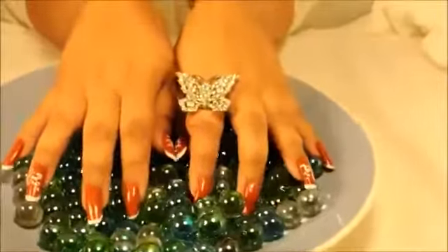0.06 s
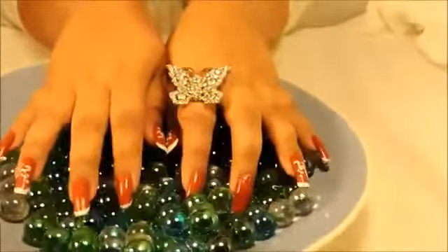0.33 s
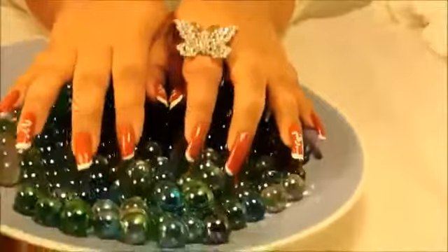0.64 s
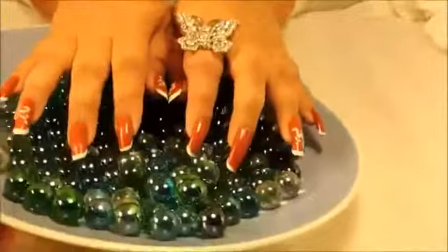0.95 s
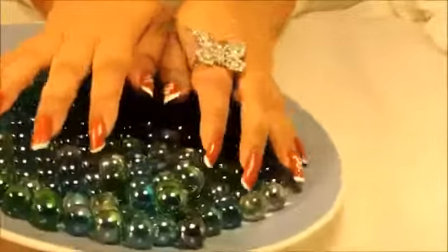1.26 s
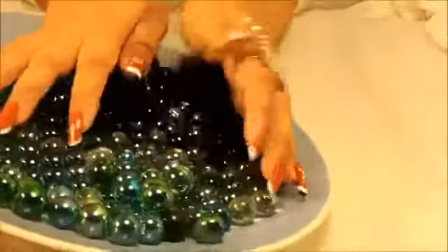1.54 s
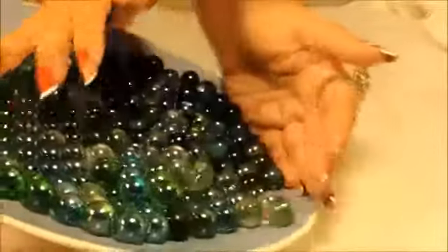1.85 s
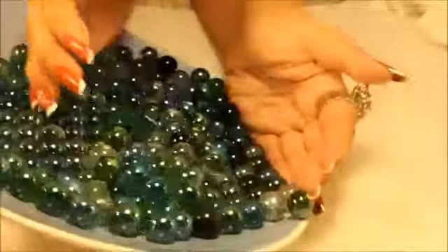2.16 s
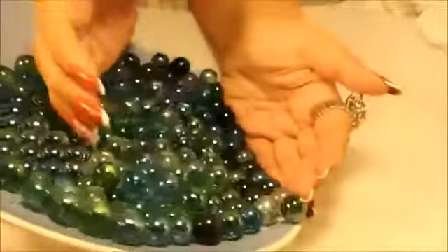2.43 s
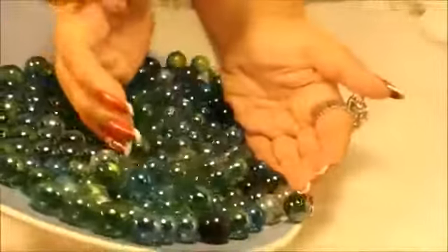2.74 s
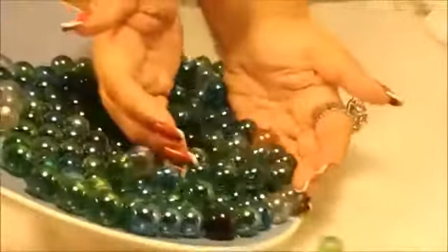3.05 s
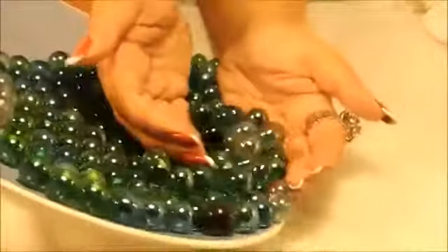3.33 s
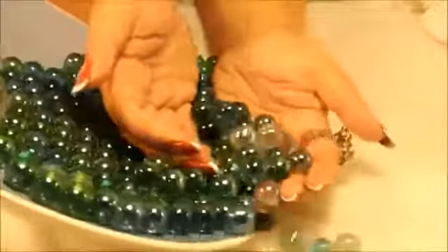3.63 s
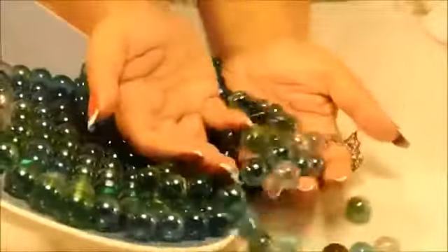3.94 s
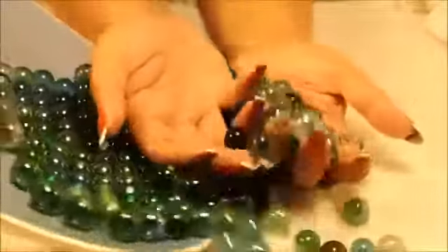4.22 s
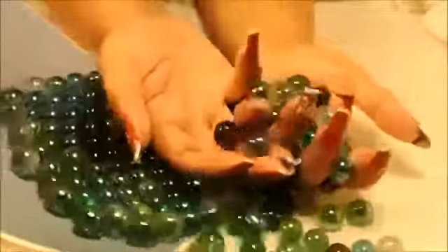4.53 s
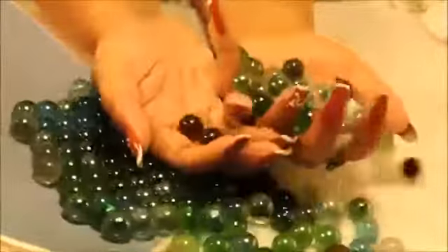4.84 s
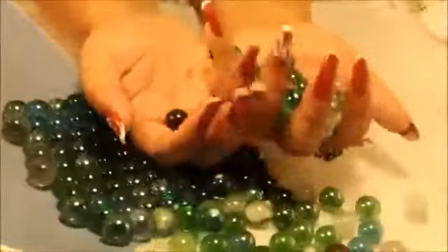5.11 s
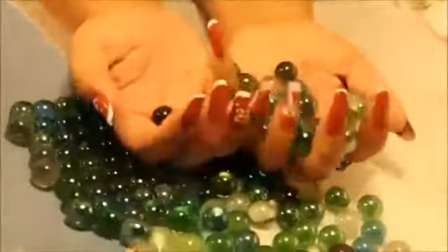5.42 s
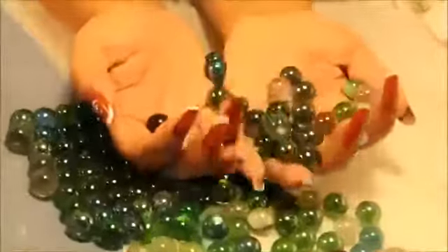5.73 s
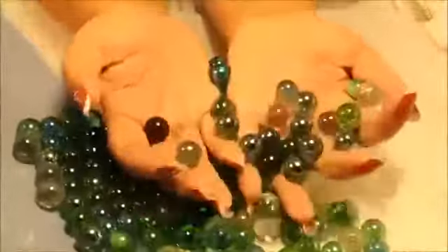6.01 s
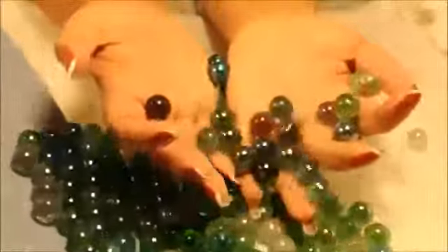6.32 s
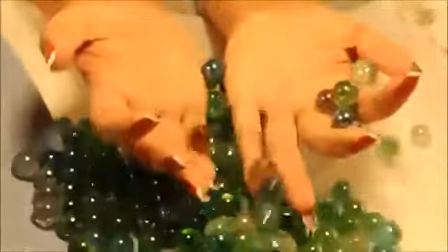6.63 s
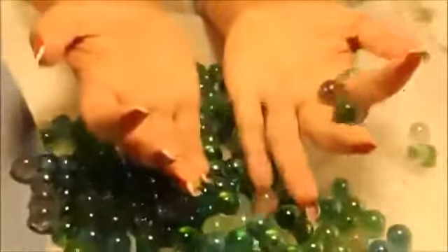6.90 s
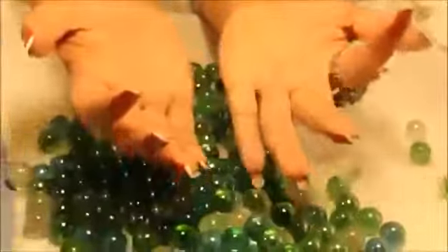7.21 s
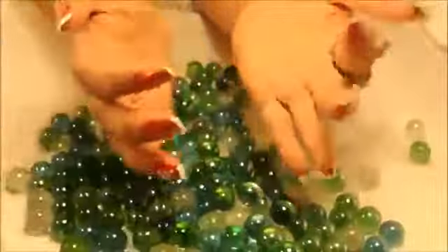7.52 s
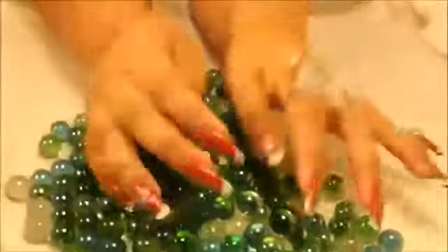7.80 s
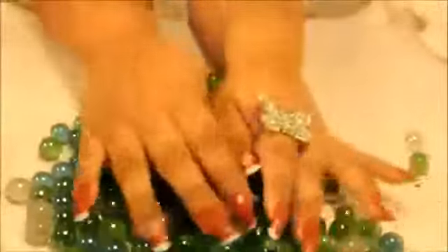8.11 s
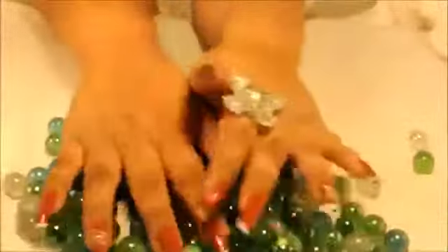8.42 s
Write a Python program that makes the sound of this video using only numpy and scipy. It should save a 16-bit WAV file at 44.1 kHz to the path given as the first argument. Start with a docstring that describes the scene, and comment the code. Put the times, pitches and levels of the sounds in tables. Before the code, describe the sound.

Glass marbles are handled on a plate, heard close and in stereo in a small bright room with a faint low rumble. From the start, fingers shove the heap in short bursts, giving sharp glassy clinks, strong around 0.7 seconds and busier from 1.3 to 2.6, with the plate ringing briefly underneath. From about 2.7 to 5.1 seconds two scooping strokes make a dense, continuous chatter and grind, while spilled marbles thud softly and bounce on a cloth-covered table; one knocks on the wood at 3.6. From 5.2 seconds the sound loosens into separate ticks and small slides as marbles trickle from the hands. Around 6.7 to 7 seconds a brighter run clatters over the plate's ringing rim, and several woody knocks follow until about 7.5. After a short lull, light rustling clicks return near 8 seconds, ending with a sharp tick at 8.5.

```python
"""Glass marbles on a plate, raked by two hands, scooped up and trickled onto a cloth-covered table.
Glass ticks on glass, the stirred heap chatters and grinds, and the plate rings briefly under it.
Spilled marbles thud on the cloth and knock on the board beneath.
Heard close, in stereo, in a small bright room with a low rumble."""
import sys
import numpy as np
from scipy import signal
from scipy.fft import rfft, irfft, next_fast_len
from scipy.io import wavfile
from scipy.ndimage import uniform_filter1d

SR = 44100
rng = np.random.default_rng(int(sys.argv[2]) if len(sys.argv) > 2 else 0)


def master_out(mix):
    """Clip the mix to full scale and print it as 16-bit PCM to the path in sys.argv[1]."""
    frames = np.transpose(np.atleast_2d(mix))
    ceiling = np.clip(frames, -1, 1)
    pcm = np.round(ceiling * 32767).astype(np.int16)
    wavfile.write(sys.argv[1], SR, pcm)


N = 377496
TIME_S = np.arange(N) / SR
AGE_S = np.arange(SR // 4) / SR  # time since a blow

# marbles striking the heap: t/s, tick level/dB, clack level/dB
HEAP_HITS = [(0.172, -25, -30), (0.2495, -29, -30), (0.4203, -9, -35.5), (0.459, -1.5, -24),
             (0.5321, -30, -21.5), (0.652, 0.5, -28.5), (0.671, 12, -19.5), (0.6928, 8.5, -19.5),
             (0.793, -2, -22), (0.822, -30, -29.5), (1.0463, 2, -26), (1.1792, -11.5, -39.5),
             (1.236, -15.5, -40), (1.307, -7, -13.5), (1.3203, -8, -25), (1.353, -20.5, -33),
             (1.4818, -5.5, -13.5), (1.5002, -20.5, -18.5), (1.6207, -3, -12), (1.641, -6, -19),
             (1.681, -5, -17.5), (1.7207, -9, -10), (1.7557, 9, -16.5), (1.792, -1.5, -21),
             (1.898, 3.5, -22), (1.961, 5, -21.5), (2.0235, -0.5, -22.5), (2.0879, 4, -22),
             (2.1123, 11, -17), (2.1864, 6.5, -17.5), (2.2191, -1.5, -22), (2.249, -8.5, -20),
             (2.3364, 0.5, -20.5), (2.359, 1.5, -15), (2.402, -7, -20), (2.4595, 3.5, -20.5),
             (2.502, 0.5, -29), (2.5788, 0, -19), (2.6421, -17.5, -19), (3.12, -11, -22), (3.2799, -2, -19),
             (3.2928, -5.5, -23), (3.454, -4, -26), (3.5002, 3.5, -20.5), (3.628, -1, -16),
             (3.6402, 2, -20.5), (3.724, -9.5, -30), (3.7759, -14, -29), (3.914, -6, -24),
             (3.9452, -4, -31), (4.086, -8, -26), (4.4715, 0.5, -36), (4.7478, -5, -27),
             (5.1015, -8.5, -23.5), (5.219, -19.5, -32.5), (5.571, -34, -30), (5.743, -4, -31.5),
             (5.845, -32, -26.5), (6.455, -29, -23), (6.6767, 1.5, -31), (6.711, -13, -30.5),
             (6.808, 1, -24), (6.849, 5.5, -28), (6.9161, 5.5, -17.5), (7.1107, -0.5, -35),
             (7.34, -15, -29)]
# glass-on-glass tick: f/Hz, level/dB
TICK_SPECTRUM = [(300, -42.5), (1500, -18.5), (5000, -4.5), (8000, 8), (12000, 13), (14500, 5),
                 (16000, -6.5)]
# plate floor, damped by the heap: f/Hz, level/dB, t60/s
PLATE_MODES = [(2700, -7.5, .04), (4380, -6, .03), (5160, 0, .05), (5340, -3, .03), (6130, -3, .045),
               (6620, -7, .035), (7200, -6, .04), (8350, -6, .04), (9020, -5, .06), (9860, -8, .035),
               (10450, -5, .05), (11250, -5, .04), (12500, -4, .055), (13470, -5, .06)]
# bare rim: f/Hz, level/dB, t60/s
RIM_MODES = [(1129, -10.5, .04), (1865, -1.5, 0.045), (2660, -1.5, 0.046), (3477, -1.5, 0.074),
             (5660, 4.5, 0.051), (9500, 2, 0.022)]
# drive into the plate, weakest with the marbles in the hands: t/s, gain/dB
PLATE_DRIVE = [(1.1, -2), (1.3, 0), (1.8, -0.5), (2.7, -1), (4.0, -9)]


def amp(db):
    """Decibels to gain."""
    return 10 ** (np.asarray(db) / 20)


def unit(x):
    """Scale to rms 1."""
    return x / np.sqrt(np.mean(x ** 2) + 1e-20)


def along(points, hz):
    """Interpolate (f/Hz, value) points on a log axis."""
    f, values = np.transpose(points)
    return np.interp(np.log(hz + 1), np.log(f), values)


def curves(rows):
    """Interpolate (t/s, values...) rows to one value per sample."""
    s, *columns = np.transpose(rows)
    return [np.interp(TIME_S, s, column) for column in columns]


def add(track, s, sound):
    """Mix sound into track at time s."""
    part = track[:, max(round(s * SR), 0):][:, :sound.shape[1]]
    part += sound[:, :part.shape[1]]


def colour(x, spectrum, size=8192):
    """Minimum-phase filter of unit energy."""
    cepstrum = irfft(np.log(amp(along(spectrum, np.fft.rfftfreq(size, 1 / SR)))))
    fold = 1 + np.sign(size // 2 - np.arange(size))
    fold[0] = 1
    response = irfft(np.exp(rfft(cepstrum * fold)))
    return signal.fftconvolve(x, response[None] / np.linalg.norm(response))[:, :x.shape[1]]


def treble(x, edge_hz):
    """Gentle zero-phase high-pass."""
    return signal.sosfiltfilt(signal.butter(2, edge_hz, "high", fs=SR, output="sos"), x)


def noise(side_db, size=len(AGE_S)):
    """Stereo white noise, rms 1."""
    mid, side = rng.standard_normal((2, size))
    return unit(np.array([mid + amp(side_db) * side, mid - amp(side_db) * side]))


def impulses(times_s, gains, lag_s=50e-6, left_lead_s=30e-6, pan_db=-0.5, half_taps=8):
    """Contacts at scattered places: windowed sincs, each with its own stereo lag and balance."""
    lag, pan = rng.standard_normal((len(times_s), 2)).T
    channels = []
    for side in (-1, 1):
        centre = (times_s + side * (left_lead_s + lag * lag_s) / 2) * SR
        taps = np.floor(centre).astype(int)[:, None] + np.arange(1 - half_taps, half_taps + 1)
        offset = taps - centre[:, None]
        window = np.cos(np.pi * offset / (2 * half_taps)) ** 2
        pulse = np.sinc(offset) * window * (gains * amp(side * pan * pan_db))[:, None]
        channels.append(np.bincount(np.clip(taps, 0, N).ravel(), pulse.ravel(), N + 1)[:N])
    return np.array(channels)


def ring(modes, detune, spread_rad, vary_db):
    """Struck body: each blow shares its energy anew among the modes; phases differ per channel."""
    hz, db, t60_s = np.transpose(modes)[:, :, None]
    strength, tune, turn = rng.standard_normal((3, len(modes), 1))
    share = amp(db + vary_db * strength)
    fade = share / np.linalg.norm(share) * amp(-60 * AGE_S / t60_s)
    phase = 2 * np.pi * hz * (1 + detune * tune) * AGE_S + rng.uniform(0, 2 * np.pi, hz.shape)
    return np.array([np.sum(fade * np.sin(phase + side * spread_rad * turn), 0) for side in (-1, 1)])


def resonate(x, modes):
    """Body kept ringing by a stream of contacts."""
    tail = ring(modes, detune=0, spread_rad=0.6, vary_db=0)
    return signal.fftconvolve(x, tail / np.linalg.norm(tail[0]), axes=1)[:, :N]


def echoes(x, decay, delay_s, blocks):
    """Diffuse echoes, decay as (f/Hz, t60/s); new paths each block as the hands move."""
    out = np.zeros((2, N))
    hop = N // blocks + 1
    for start in range(0, N, hop):
        hz, t, bins = signal.stft(rng.standard_normal((2, SR // 2)), SR, nperseg=128)
        tail = signal.istft(bins * amp(-60 * t / along(decay, hz)[:, None]), SR, nperseg=128)[1]
        tail /= np.linalg.norm(tail, axis=1, keepdims=True)
        add(out, start / SR + delay_s, signal.fftconvolve(x[:, start:start + hop], tail, axes=1))
    return out


def room_tone(rumble_db=1, air_db=2, waver_hz=3.02):
    """Low rumble with a wavering hum and a soft rush of air; the background level rises and dips."""
    # t/s, rumble level/dB, air level/dB
    levels = [(0, -46.5, -51.5), (1.2, -46.5, -47.5), (2.4, -55, -57), (3.9, -58, -58.5), (4.5, -51.5, -64),
              (5.3, -54, -62), (6.2, -49.5, -58), (7.1, -53.5, -56), (7.7, -57.5, -69), (8.5, -46, -52.5)]
    # f/Hz, level/dB re rumble, onset/s
    hum_tones = [(63.5, -7, 1.5), (156.3, -3.5, 5)]
    # spectra: f/Hz, level/dB
    rumble_spectrum = [(12, -32.5), (25, 8.5), (42, -3.5), (64, 5.5), (80, -3.5), (125, 1), (160, -3.5),
                       (195, -4), (320, -9.5), (700, -36)]
    air_spectrum = [(150, -5), (300, -0.5), (700, 3), (1500, -5.5), (12000, -15.5), (15000, -49.5)]
    low_db, mid_db = curves(levels)
    drift_hz = waver_hz * unit(uniform_filter1d(rng.standard_normal(N), SR // 20))
    hum = np.zeros(N)
    for hz, db, onset_s in hum_tones:
        fade_in = np.clip(10 * (TIME_S - onset_s), 0, 1)
        hum += amp(db) * fade_in * np.sin(2 * np.pi * np.cumsum(hz + drift_hz) / SR)
    rumble = amp(low_db + rumble_db) * (colour(noise(side_db=-15, size=N), rumble_spectrum) + hum)
    return rumble + amp(mid_db + air_db) * colour(noise(side_db=-6.5, size=N), air_spectrum)


def landings(bounce_s=0.043, rise_s=0.0015, boom_t60_s=0.19, narrow_db_per_oct=9):
    """Marbles hit the table: cloth softens the blow to a thud and bounce; thin cloth passes a knock."""
    # soft landings: t/s, level/dB
    thuds = [(2.803, -43.5), (2.917, -40), (3.02, -42.5), (3.189, -39), (3.27, -41), (3.715, -43),
             (3.888, -43), (3.966, -41), (4.177, -39.5), (4.375, -40), (4.462, -39), (4.563, -42),
             (4.655, -42), (4.742, -41.5), (4.815, -40.5), (4.924, -45), (5.022, -42), (6.151, -46),
             (6.497, -41.5)]
    # hard landings: t/s, level/dB, f/Hz, relative boom level/dB
    knocks = [(3.627, -16, 2026, -36), (5.299, -30, 1705, -16), (6.149, -30, 2190, -14),
              (6.76, -30.5, 1246, -8.5), (6.861, -18, 1250, -19.5), (7.089, -23, 1230, -14.5),
              (7.201, -23, 1856, -23), (7.301, -19.5, 2060, -23.5), (7.431, -13.5, 1920, -30)]
    # low table-top ring and short woody ring: f/Hz, level/dB, t60/s
    top_modes = [(263, -3, 0.095), (399, 1, 0.29), (437.3, 10, 0.19), (640, -5.5, 0.045), (695, 2, 0.16)]
    board_modes = [(1283, 0.5, 0.015), (1777, -4.5, 0.012), (2003.5, 4, .013), (2320, -1.5, 0.012)]
    # board shudder: f/Hz, level/dB
    boom_spectrum = [(100, -19), (270, -4), (420, -4), (1000, -4.5), (2500, -84)]
    out, shudder = np.zeros((2, 2, N))
    attack = 1 - np.exp(-AGE_S / rise_s)
    boom_envelope = attack * amp(-60 * AGE_S / boom_t60_s)
    for s, db in thuds:
        thud = ring(top_modes, detune=0.029, spread_rad=0.13, vary_db=2.5)
        add(out, s, amp(db + 0.5) * attack * thud)
        flight_s = bounce_s * (0.5 + rng.random())
        bounce = ring(top_modes, detune=0.0044, spread_rad=0.13, vary_db=1)
        add(out, s + flight_s, amp(db - 8) * attack * bounce)
        add(shudder, s, amp(db - 8) * boom_envelope * noise(side_db=-7))
    for s, db, hz, boom_db in knocks:
        # a blow favours the modes near its own pitch
        modes = [(f, level - narrow_db_per_oct * abs(np.log2(f / hz)), t60_s)
                 for f, level, t60_s in board_modes]
        add(out, s, amp(db + 1) * ring(modes, detune=0.02, spread_rad=0.3, vary_db=1))
        add(shudder, s, amp(db + boom_db - 1) * boom_envelope * noise(side_db=-13))
    return out + colour(shudder, boom_spectrum)


def free_ticks(tick_db=9.5, rebound_db=-9, rebound_s=0.0031, travel_s=0.00079):
    """Two free marbles meet: a dry tick and a weak rebound."""
    # t/s, level/dB
    meetings = [(0.611, -8), (2.7397, -12), (3.0555, -11.5), (3.8099, -23), (3.879, -12.5), (4.1768, -12.5),
                (4.1813, -8.5), (4.211, -11), (4.3367, -12), (4.3696, -7), (4.3942, -12), (4.4082, -6),
                (4.5217, -7), (4.588, -9.5), (4.6289, -8.5), (4.95, -20), (5.0266, -11), (5.0717, -7.5),
                (5.255, -16), (5.5586, -17.5), (5.7081, -6), (5.991, -9.5), (6.1486, -5), (6.1871, -4),
                (6.2493, -17), (6.2847, -11.5), (6.34, -15.5), (6.4974, -18), (6.507, -8.5),
                (6.5988, -10.5), (6.65, -4), (6.8967, -5), (6.9036, -7), (7.025, -9), (7.199, -3.5),
                (7.428, -3), (7.5257, -11.5), (8.1528, -19), (8.1848, -15.5), (8.523, -1)]
    s, db = np.transpose(meetings)
    gap_s = rebound_s * (0.5 + rng.random(len(s)))
    first = impulses(s + travel_s, amp(db + tick_db), pan_db=0.5)
    rebound = impulses(s + travel_s + gap_s, amp(db + tick_db + rebound_db))
    ticks = colour(first + rebound, TICK_SPECTRUM)
    return ticks + amp(-8) * echoes(ticks, [(1000, 0.008), (12000, 0.039)], delay_s=0.0002, blocks=30)


def stirring(rest_db=-75.5, edge_s=0.01, sag_db_per_s=14, release_db_per_s=169.5, settle_db_per_s=97):
    """Chatter and grind levels in dB: creep at rest, shoves, the scoop, settling after each hit."""
    # finger shoves, slides out of the palms: t/s, length/s, chatter level/dB, grind/dB re chatter
    shoves = [(0.0, 0.044, -34, -7.5), (0.137, 0.043, -35, -6.5), (0.455, 0.15, -40.5, 0),
              (0.68, 0.062, -41.5, -5.5), (1.65, 0.053, -30, -8), (1.956, 0.098, -34, -5),
              (2.112, 0.13, -33.5, -5.5), (2.371, 0.27, -29, -6.5), (5.235, 0.28, -40.5, -2),
              (5.549, 0.024, -38.5, 0), (5.642, .06, -40.5, -6), (5.708, 0.072, -33.5, -12),
              (5.993, 0.026, -31.5, -1.5), (6.178, 0.07, -41, -17), (6.326, 0.053, -40, -10),
              (6.422, 0.098, -34.5, -6.5), (6.688, 0.25, -30, -7.5), (7.003, 0.32, -41, -10),
              (7.928, 0.033, -48, -17), (8.146, 0.31, -51, -8), (8.361, 0.16, -40, -21),
              (8.51, 0.021, -28.5, -29)]
    # two strokes, across the plate and up into the palms: t/s, chatter level/dB, grind level/dB
    scoop = [
        [(2.67, -28, -36), (2.922, -28, -36), (3.03, -38, -45.5), (3.12, -20, -24.5), (3.335, -30.5, -34.5),
         (3.366, -25.5, -25), (3.394, -30.5, -36), (3.472, -30.5, -38.5), (3.56, -22.5, -26), (3.61, -29, -33)],
        [(3.78, -32.5, -35), (3.87, -39.5, -43), (3.886, -32, -37.5), (4.068, -40, -47.5), (4.112, -31, -34.5),
         (4.15, -35, -43.5), (4.243, -34, -41), (4.256, -26.5, -33.5), (4.35, -30, -38), (4.55, -28, -34),
         (4.666, -29.5, -33.5), (4.735, -34.5, -41), (4.756, -28, -32.5), (4.93, -27, -29), (5.084, -30, -37.5),
         (5.108, -33.5, -33), (5.2, -50, -51)],
    ]
    level = np.full((2, N), amp(rest_db))
    for start_s, length_s, db, grind_db in shoves:
        age_s = np.maximum(TIME_S - start_s, 0)
        attack = 1 - np.exp(-age_s / edge_s)
        fall_db = sag_db_per_s * age_s + release_db_per_s * np.maximum(age_s - length_s, 0)
        level = np.maximum(level, amp([[db], [db + grind_db]]) * attack * amp(-fall_db))
    for stroke in scoop:
        outside_s = np.abs(TIME_S - np.clip(TIME_S, stroke[0][0], stroke[-1][0]))
        stroke_db = np.array(curves(stroke)) + [[-1.5], [-0.5]]
        level = np.maximum(level, amp(stroke_db) * np.exp(-outside_s / edge_s))
    settling_power = np.zeros((1, N))
    for s, _, clack_db in HEAP_HITS:
        add(settling_power, s, amp(clack_db - 26 - settle_db_per_s * AGE_S[None]) ** 2)
    return 10 * np.log10(level ** 2 + settling_power)


def contacts(level_db, rate_hz, hardness_db, even_s, idle_hz=60, slip_hz=40, cascade_s=0.028):
    """Random small collisions; faster stirring makes more and harder ones."""
    # a handful holds fewer moving marbles than the plate: t/s, collision rate/dB
    crowd = [(2.4, -5), (2.7, 0), (3.6, 0), (3.8, -7), (5.1, -7), (5.3, -10.5)]
    crowd_db, = curves(crowd)
    busy_hz = rate_hz * amp(0.5 * (level_db - level_db.max()) + crowd_db)
    times_s = TIME_S[rng.random(N) < (busy_hz + idle_hz) / SR]
    # a slipping marble sets off a brief cascade among its neighbours
    slips = rng.random(N) < slip_hz / SR
    cascade = np.minimum(signal.lfilter([1], [1, -np.exp(-1 / (cascade_s * SR))], slips), 1)
    cascade_db = 7 * np.interp(times_s, TIME_S, cascade)
    hardness = np.clip(rng.standard_normal(len(times_s)), -2, 2)
    train = impulses(times_s, amp(hardness_db * hardness + cascade_db))
    # the push is shared among the collisions of each moment
    width = int(even_s * SR)
    power = np.abs(uniform_filter1d(uniform_filter1d(np.mean(train ** 2, 0), width), width))
    return train / np.sqrt(power + 0.012 * power.mean()) * amp(level_db)


def snaps(level_db, max_rate_hz=110, over_db=14, pitch_hz=7500, spread_oct=0.7, decay_cycles=5):
    """Squeezed marbles spring free and click above the chatter, each at its own pitch."""
    activity = np.minimum(2 * amp(0.5 * (level_db - level_db.max())), 1)
    times_s = TIME_S[rng.random(N) < max_rate_hz * activity / SR]
    out = np.zeros((2, N))
    for s, (hardness, tune, turn) in zip(times_s, rng.uniform(-0.97, 1, (len(times_s), 3))):
        cycles = pitch_hz * 2 ** (spread_oct * tune) * AGE_S[:SR // 100]
        click = np.exp(-cycles / decay_cycles) * np.sin(2 * np.pi * cycles + [[turn], [-turn]])
        add(out, s, amp(level_db[int(s * SR)] + over_db + 2 * hardness) * click)
    return out


def cavities(x, low_hz=2900, high_hz=12500, t60_s=0.023, mode_count=4, blocks=260):
    """Gaps between marbles ring at pitches that change as the heap rearranges."""
    out = np.zeros((2, N))
    hop = N // blocks + 1
    for start in range(0, N, hop):
        modes = [(hz, 0, t60_s) for hz in low_hz * (high_hz / low_hz) ** rng.random(mode_count)]
        tail = ring(modes, detune=0, spread_rad=0.49, vary_db=0.5)[:, :SR // 16]
        tail /= np.linalg.norm(tail, axis=1, keepdims=True)
        add(out, start / SR, signal.fftconvolve(x[:, start:start + hop], tail, axes=1))
    return out


def on_rim(s):
    """True while the trickle runs over the plate's rim."""
    return (s > 6.69) & (s < 6.98)


def heap():
    """Marbles jostle under the fingers: free ones chatter, pressed ones grind, the plate rings."""
    # spectra: f/Hz, level/dB
    chatter_spectrum = [(1500, -27), (3500, -9.5), (5200, -3.5), (6900, 2), (7700, -2.5), (9500, 2),
                        (11500, 0.5), (14100, -1), (14700, -40)]
    grind_spectrum = [(300, -22), (900, -11), (1400, -3), (2300, 4.5), (3000, 3.5), (3650, 4.5),
                      (4100, 0.5), (6000, -5), (12000, -43.5)]
    chatter_db, grind_db = stirring()
    free = contacts(chatter_db - 2, rate_hz=900, hardness_db=3, even_s=0.062)
    pressed = contacts(grind_db - 4, rate_hz=2200, hardness_db=-1.5, even_s=0.09)
    direct = colour(free, chatter_spectrum) + colour(pressed, grind_spectrum)
    scatter = echoes(treble(direct, 1900), [(2000, 0.046), (12000, 0.038)], delay_s=0.0001, blocks=50)
    plate = amp(-6) * resonate(direct * amp(curves(PLATE_DRIVE)), PLATE_MODES)
    rim = amp(-2) * resonate(direct * on_rim(TIME_S), RIM_MODES)
    return direct + snaps(chatter_db) + amp(2.5) * scatter + amp(-3.5) * cavities(direct) + plate + rim


def clinks(ring_db=12, rim_db=-7, main_t60_s=0.021, main_split=0.022, clack_t60_s=0.046, rise_s=0.00059):
    """Marbles strike the heap: a hard tick, a clack through the neighbours, a ring of plate or rim."""
    # strongest plate ring, set by strike point and load: t/s, f/Hz, level/dB
    main_rings = [(.7, 5550, 4.5), (1.2, 2740, 5), (1.31, 4120, 1.5), (1.48, 3895, 4), (1.72, 3826, 3.5),
                  (1.94, 3563, 0.5), (2.3, 3578, -0.5), (2.6, 3614, 7.5)]
    # f/Hz, level/dB
    clack_spectrum = [(300, -30), (900, -5.5), (1800, -0.5), (2700, 2.5), (4000, 5.5), (7000, 7),
                      (10000, 6), (13500, -3), (14700, -22)]
    times_s, tick_db, clack_db = np.transpose(HEAP_HITS)
    main_s, main_hz, main_db = np.transpose(main_rings)
    ticks = colour(impulses(times_s + 0.00039, amp(tick_db + 3.5), pan_db=2), TICK_SPECTRUM)
    scatter = echoes(ticks, [(1000, 0.0087), (12000, 0.037)], delay_s=0.0003, blocks=40)
    clacks, plate = np.zeros((2, 2, N))
    attack = 1 - np.exp(-AGE_S / rise_s)
    for s, db in zip(times_s, clack_db):
        if on_rim(s):
            modes, drive_db = RIM_MODES, rim_db
        else:
            row = np.argmin(np.abs(main_s - s))
            pair = [(main_hz[row] * (1 + side * main_split), main_db[row], main_t60_s)
                    for side in (-1, 1)]
            modes = pair + PLATE_MODES
            drive_db = np.interp(s, *np.transpose(PLATE_DRIVE))
        add(clacks, s, amp(db + 3.5 - 60 * AGE_S / clack_t60_s) * attack * noise(side_db=-8))
        ringing = ring(modes, detune=0.008, spread_rad=1, vary_db=1.3)
        add(plate, s, amp(db + ring_db + drive_db) * attack * ringing)
    return ticks + amp(-3) * scatter + colour(clacks, clack_spectrum) + plate


def scene(wet_db=-6, left_db=-0.57, shade_hz=10500, wall_hz=1000):
    """Marbles and table in the room, balanced slightly to the right."""
    # hands over the heap shade its top treble: t/s, share covered/0-1
    hand_cover = [(.3, 1), (.7, 1), (1.2, 0.9), (1.3, 0.53)]
    # room decay: f/Hz, t60/s
    wall_decay = [(200, 0.22), (1200, 0.3), (3000, 0.23), (6000, 0.31), (13000, 0.2)]
    glass = clinks() + free_ticks() + heap()
    cover, = curves(hand_cover)
    direct = glass - cover * treble(glass, shade_hz) + landings()
    room = amp(wet_db) * echoes(treble(direct, wall_hz), wall_decay, delay_s=0.005, blocks=24)
    return (direct + room + room_tone()) * amp([[left_db], [-left_db]])


def record(dry, ceiling=0.9, top_hz=16400):
    """Clip the peaks, roll off the top treble, band-limit."""
    size = next_fast_len(N + SR // 2)
    hz = np.fft.rfftfreq(size, 1 / SR)
    rolloff = amp(along([(13800, 0.5), (14700, -17.5), (16000, -20.5)], hz))
    spectrum = rfft(np.clip(dry, -ceiling, ceiling), size)
    return irfft(spectrum * rolloff * (hz < top_hz), size)[:, :N]


dry = scene()
out = record(dry)
master_out(out)
```